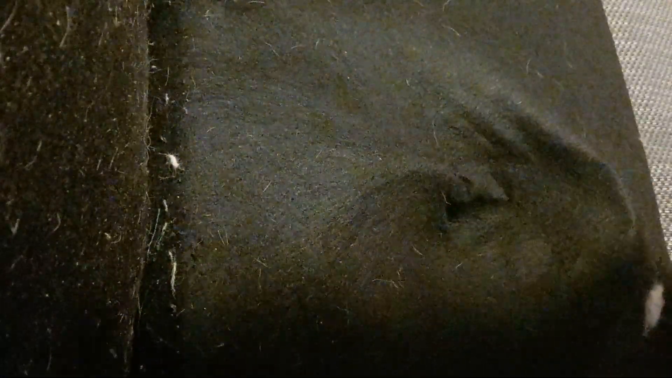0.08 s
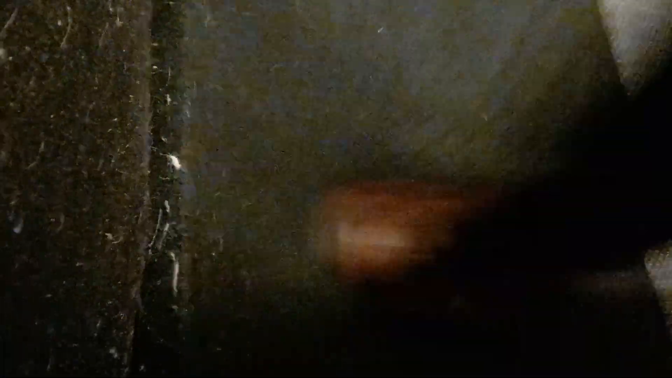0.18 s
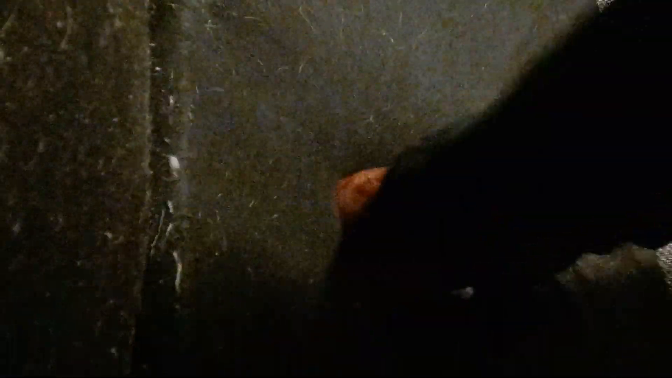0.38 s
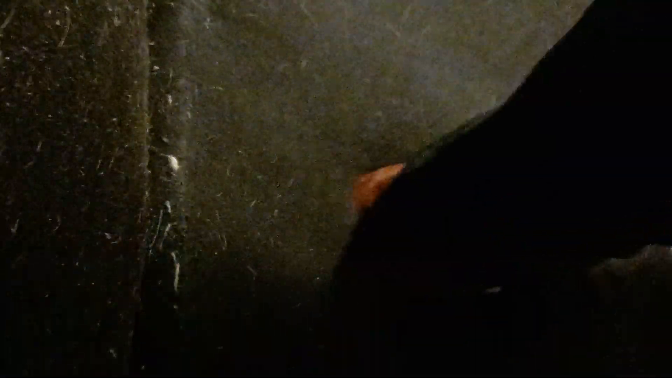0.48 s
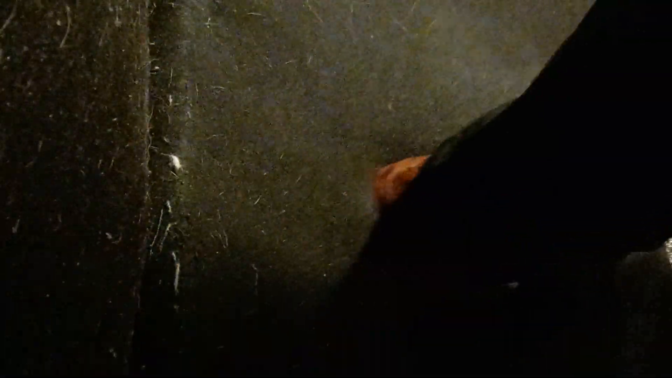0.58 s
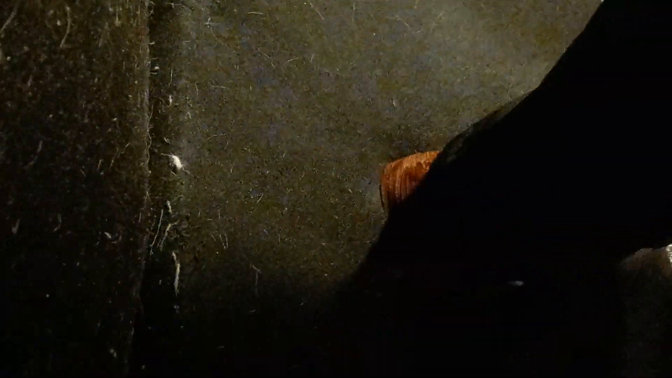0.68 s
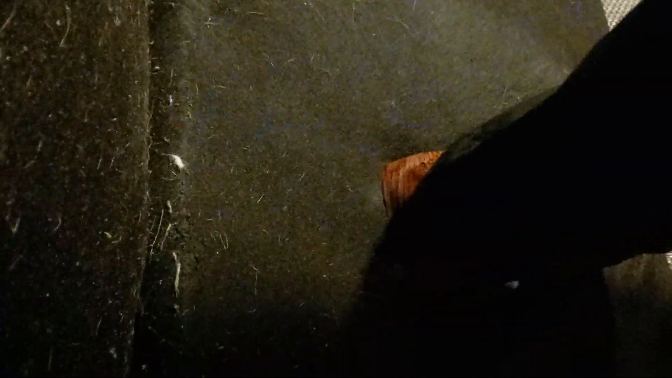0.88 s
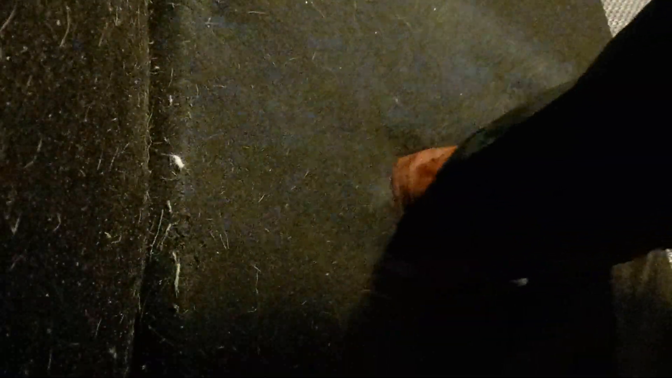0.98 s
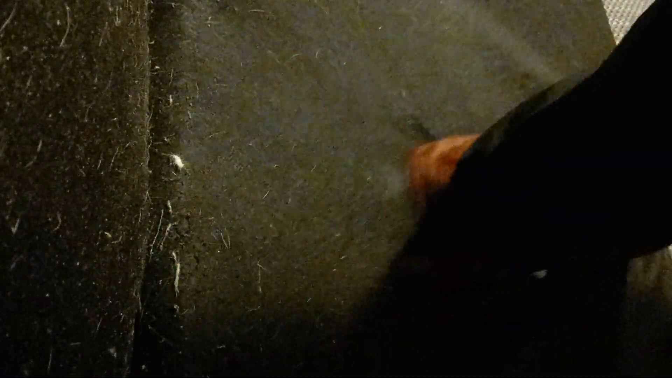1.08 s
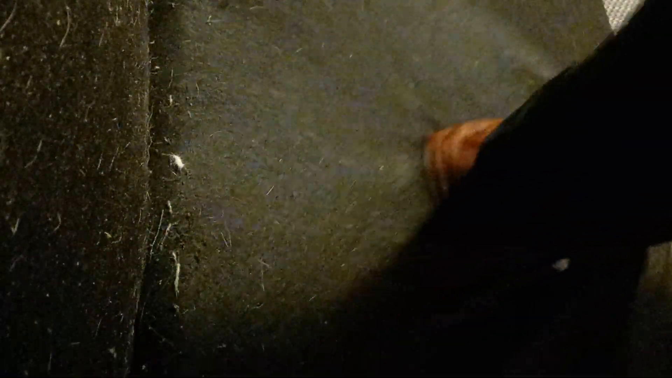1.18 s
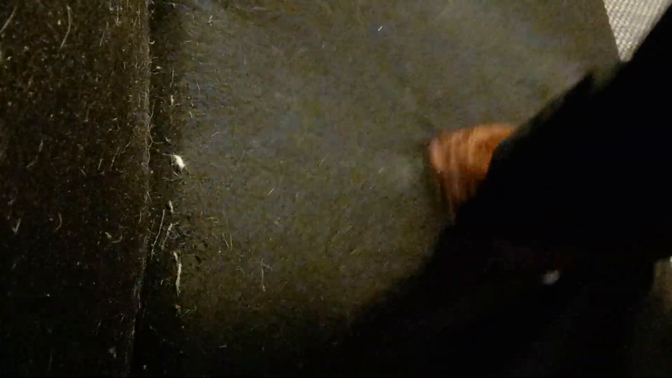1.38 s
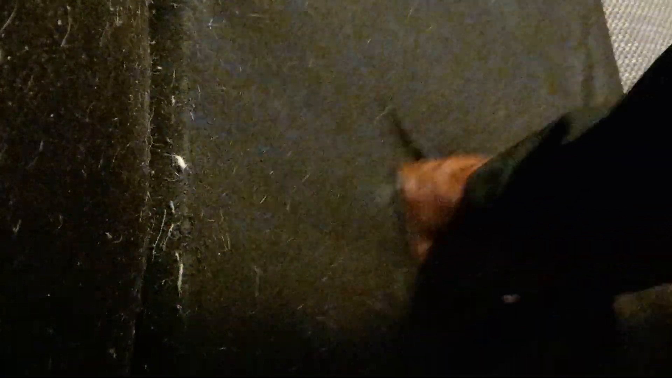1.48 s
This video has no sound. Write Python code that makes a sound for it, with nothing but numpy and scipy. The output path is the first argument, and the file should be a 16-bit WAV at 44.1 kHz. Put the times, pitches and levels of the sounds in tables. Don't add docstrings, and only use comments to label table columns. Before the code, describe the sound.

One shoe stomp crushes a spring-filled cushion: a quick crunch of clunking coils, falling in pitch to a low boom, with rasping cloth; then soft air buffets, few faint ticks. Very close stereo microphone, quiet room.

```python
import sys
import numpy as np
from scipy import signal
from scipy.fft import rfft, irfft
from scipy.io import wavfile
from scipy.ndimage import uniform_filter1d

SR = 44100
rng = np.random.default_rng(int(sys.argv[2]) if len(sys.argv) > 2 else 0)


def voltage_ratio(level):
    return 10 ** (np.asarray(level, float) / 20)


def digitize_waveform(pressure):
    field = np.atleast_2d(pressure).T
    bounded = np.clip(field, -1, 1)
    quanta = np.round(bounded * 32767).astype(np.int16)
    wavfile.write(sys.argv[1], SR, quanta)


N = 66150


def evened(x):
    return x / np.sqrt(np.mean(x ** 2) + 1e-20)


def read(points, hz):
    f, value = np.transpose(points)
    return np.interp(np.log(hz + 1), np.log(f + 1), value)


def add(mix, start_s, sound):
    part = mix[..., round(start_s * SR):][..., :sound.shape[-1]]
    part += sound[..., :part.shape[-1]]


def band_pass(x, order, edges_hz):
    return signal.sosfilt(signal.butter(order, edges_hz, "band", fs=SR, output="sos"), x)


def smoothed(x, size):
    return uniform_filter1d(uniform_filter1d(x, size=size), size=size)


def coloured(x, spectrum, same=None):
    hz, z = np.fft.rfftfreq(N, 1 / SR), rfft(x)
    if same:
        c = np.clip(read(same, hz), -1, 1)
        z = np.array([z[0], c * z[0] + np.sqrt(1 - c ** 2) * z[1]])
    closing = np.minimum(hz / spectrum[0][0], 1) ** 2
    return evened(irfft(z * voltage_ratio(read(spectrum, hz)) * closing, N))


def knock(mix, peak_s, peak_db, hz, cycles, skew, power=2, edge=0.):
    u = np.arange(0, 1, hz / cycles / SR)
    top = .5 ** (1 / skew)
    turn = 2 * np.pi * cycles * (u - top)
    hump = abs(np.sin(np.pi * u ** skew)) ** power
    wave = np.cos(turn) + edge * np.cos(3 * turn)
    add(mix, peak_s - top * cycles / hz, voltage_ratio(peak_db) * hump * wave)


# freq_hz, level_db (per Hz)
ROOM_HUSH = [(410, -48.5), (700, -14), (931, -11.5), (1070, -14.5), (1160, -1), (1490, -6.5), (2630, -19),
             (3370, -25), (15600, -34.5)]


def room():
    return voltage_ratio(-73.5) * coloured(rng.standard_normal((2, N)), ROOM_HUSH)


# peak_s, peak_db, pitch_hz, cycles
PUFFS_LEFT = [(.022, -33.5, 111, 6.4), (.049, -16.5, 137, 1.5), (.083, -50, 116, 2.4),
              (.152, -23, 171, 2.5), (.367, -17.5, 109, 0.57), (.419, -20, 96, 1.26),
              (.464, -24.5, 113, 4.2), (.504, -38, 91.5, 1.9), (.671, -25, 155.7, 7),
              (.702, -16.5, 119, 6.2), (.722, -15.5, 163, 1.75), (.797, -41, 84.5, 2.7),
              (.833, -41, 87, 2.9), (.85, -20.5, 101.4, 3.2), (.862, -27.5, 245, 4.2),
              (.901, -38, 267, 3.5), (.915, -19, 130, 0.99), (.967, -27, 105.8, 12.4),
              (.998, -15, 189, 2.05), (1.009, -20.5, 113, 4), (1.061, -23, 135, 2.3),
              (1.143, -25.5, 147, 3.3), (1.158, -14.5, 174, 2.9), (1.1645, -23, 511, 2.9),
              (1.173, -13.5, 102.6, 2.52), (1.197, -24, 137, 4.4), (1.214, -21, 122, 2.5),
              (1.322, -30, 113, 5.2), (1.376, -27, 126, 3.1), (1.442, -27.5, 125.3, 6.2),
              (.58, -31, 100, 2), (.669, -31, 330, 4), (.697, -24, 340, 4), (.722, -25, 320, 3),
                   (.748, -30, 110, 3), (.863, -34, 400, 4), (.905, -34, 400, 4), (.998, -35, 450, 2.5),
                   (1.1648, -30, 640, 2.5), (1.29, -28, 160, 3), (1.471, -20, 125, 2), (.785, -27, 85, 3),
                   (1.085, -28, 95, 3)]
# peak_s, peak_db, pitch_hz, cycles
PUFFS_RIGHT = [(0.053, -41.5, 88, 7.8), (0.562, -45.5, 88, 7.2), (0.613, -35.5, 92, 2.4),
               (0.841, -39, 90.3, 2), (0.923, -32, 104.6, 0.93), (1.069, -48, 87.5, 1.3),
               (1.105, -31, 97, 3.9), (1.149, -64, 109, 2), (1.243, -40.5, 90, 1.7), (1.263, -30, 90, 1.8),
               (1.298, -28, 91, 0.35), (1.396, -44, 88, 4.3)]
# freq_hz, level_db (per Hz)
DRAUGHT_SPECTRA = [
    [(20, -58.5), (45, -9), (90, 6), (130, -4), (220, -3.5), (430, -22), (860, -33.5), (1500, -71.5)],
    [(20, -52.5), (45, -21), (85, -1), (130, -1.5), (200, -19.5), (430, -21.5), (860, -29.5), (1500, -59)],
]
DRAUGHT_DB = [-36.5, -47]
LULL_S, LULL_HALF_S, LULL_DB = .595, .072, -13
GUST_SHARE, GUST_S = .36, .032
FLUTTER_DB, FLUTTER_HZ = -18, [235, 481]


def air():
    out = np.zeros((2, N))
    lull_db = LULL_DB * np.exp(-((np.arange(N) / SR - LULL_S) / LULL_HALF_S) ** 4)
    gust_window = np.hanning(round(2 * GUST_S * SR)) / (GUST_S * SR)
    below_450_hz = signal.butter(4, 450, fs=SR, output="sos")
    for port, puffs in enumerate([PUFFS_LEFT, PUFFS_RIGHT]):
        for puff in puffs:
            knock(out[port], *puff, skew=0.69)
        power = out[port] ** 2
        puff_strength = np.sqrt(abs(smoothed(power, 400)))
        gust = np.sqrt(signal.oaconvolve(power, gust_window, "same").clip(0))
        lumps_db = 4 * evened(smoothed(rng.standard_normal(N), 500))
        draught = coloured(rng.standard_normal(N) * voltage_ratio(lumps_db), DRAUGHT_SPECTRA[port])
        swell = signal.sosfilt(below_450_hz, GUST_SHARE * gust * draught)
        flutter = evened(band_pass(rng.standard_normal(N), 3, FLUTTER_HZ))
        out[port] += voltage_ratio(DRAUGHT_DB[port] + lull_db) * draught
        out[port] += swell + voltage_ratio(FLUTTER_DB) * puff_strength * flutter
    return -out


# start_s, level_db
RUB = [(0, -50.5), (.012, -61.5), (.045, -66.5), (.11, -60), (.14, -63.5), (.3, -43.5), (.46, -61.5),
       (.5, -53), (.55, -55.5), (.575, -54), (.61, -54), (.66, -63), (.8, -73.5), (.93, -69.5),
       (1.01, -65.5), (1.2, -59.5), (1.28, -64), (1.345, -65)]
# start_s, level_db
LIFT = [(1.362, -62), (1.373, -57), (1.445, -55), (1.46, -55.5), (1.5, -58.5)]
# start_s, level_db
DRAG = [(.171, -75), (.174, -47), (.195, -43), (.199, -36), (.221, -34), (.226, -28), (.246, -28),
        (.265, -38), (.272, -50)]
# start_s, level_db
REBOUND = [(.273, -59), (.29, -44.5), (.345, -44.5), (.362, -72), (.385, -58.5), (.41, -53.5), (.44, -63.5),
           (.455, -68)]
# freq_hz, level_db (per Hz)
SOFT_SPECTRUM = [(700, 4), (1600, -8), (2100, -11.5), (3400, -9.5), (8000, -9.5), (9000, -23.5),
                 (13000, -26.5), (15600, -18.5)]
# freq_hz, level_db (per Hz)
HARD_SPECTRUM = [(700, 0.5), (1700, -22), (2200, -20.5), (3000, -9.5), (7800, -12), (9300, -26),
                 (13000, -20.5), (15600, -25.5)]
# freq_hz, likeness (-1 to 1)
SOFT_SAME = [(700, 0.1), (1400, -0.42), (3000, 0.31), (7000, -0.15), (15000, -0)]
# freq_hz, likeness (-1 to 1)
HARD_SAME = [(700, 0.24), (2500, 0.62), (5000, -0.58), (9000, -0.049), (15000, 0)]
GRAINS_PER_S, GRAIN_DB, GRAIN_SHARE = 2000, 16.5, 0.17
RUB_LEFT_DB = 1


def cloth():
    t = np.arange(N) / SR
    grain_size = voltage_ratio(GRAIN_DB * np.minimum(rng.exponential(1, (2, N)), 4))
    struck = rng.random((2, N)) < GRAINS_PER_S / SR
    grains = grain_size * struck * rng.choice([-1, 1], (2, N))
    flicker = voltage_ratio(0.43 * evened(uniform_filter1d(rng.standard_normal(N), size=300)))
    x = (GRAIN_SHARE * evened(grains) + rng.standard_normal((2, N))) * flicker
    soft_db = np.interp(t, *np.transpose(RUB + LIFT))
    hard_db = np.interp(t, *np.transpose(DRAG + REBOUND), -120, -120)
    soft = voltage_ratio(soft_db) * coloured(x, SOFT_SPECTRUM, SOFT_SAME) * voltage_ratio([[RUB_LEFT_DB], [-RUB_LEFT_DB]])
    return soft + voltage_ratio(hard_db) * coloured(x, HARD_SPECTRUM, HARD_SAME)


# start_s, resonance_hz, level_db
CRUSH = [(0.167, 260, -47), (0.176, 247, -33), (0.208, 425, -35), (0.232, 600, -22), (0.268, 420, -23),
         (.31, 182, -31), (.42, 152, -39), (0.521, 200, -51), (.65, 450, -62)]
CRUSH_WIDTH_HZ = 418


def stuffing():
    s, hz, db = np.transpose(CRUSH)
    t = np.arange(N) / SR
    a, b = rng.standard_normal((2, N))
    x = np.array([a + 0.34 * b, a - 0.19 * b])
    turn = np.exp(2j * np.pi * np.cumsum(np.interp(t, s, hz)) / SR)
    r = np.exp(-np.pi * CRUSH_WIDTH_HZ / SR)
    once = signal.lfilter([1 - r], [1, -r], x / turn)
    twice = signal.lfilter([1 - r], [1, -r], once)
    groan = evened((turn * twice).real)
    return groan * voltage_ratio(np.interp(t, s, db, -120, -120))


# peak_s, peak_db, pitch_hz, cycles
CLUNKS = [(0.183, -36, 280, 4.5), (0.192, -20.5, 326.4, 3.2), (0.203, -16, 187, 1.7),
          (0.218, -18, 440, 3.4), (.2255, -13.5, 642, 5.5), (0.2312, -4.5, 520, 4), (0.227, -33, 1550, 9),
          (.2385, -16.5, 702, 4.5), (.249, -20, 1060, 6), (0.2414, -9, 274, 6.6), (0.2508, -8.5, 400, 2.6),
          (.259, -14.5, 340, 2.2), (0.2674, -8, 249.6, 4.1), (0.2678, -15.5, 897, 8.2),
          (.2635, -17, 546, 3), (0.278, -25.5, 890, 13), (0.319, -22.5, 242, 2.5), (.324, -35, 896, 8),
          (.333, -48, 179.6, 0.67), (0.398, -31, 291.7, 1.7), (1.446, -40.5, 533, 3.7),
          (0.174, -36, 1426, 4.9), (0.276, -13, 196, 2)]
CRACK_HZ, CRACK_FADE_S, CRACK_DB = [1100, 2000], .007, -10
CRACK_TOP_S, CRACK_FADE_DB_PER_S = .225, 350


def springs():
    out = np.zeros((2, N))
    a, b = np.moveaxis(rng.standard_normal((len(CLUNKS), 2, 900)), 1, 0)
    cracks = evened(band_pass(np.stack([.8 * a + .45 * b, a - .45 * b], 1), 2, CRACK_HZ))
    fade = np.exp(-np.arange(900) / SR / CRACK_FADE_S)
    for (s, db, hz, cycles), crack in zip(CLUNKS, cracks):
        knock(out, s, db, hz, cycles, skew=0.55)
        bite_db = CRACK_DB - min(CRACK_FADE_DB_PER_S * abs(s - CRACK_TOP_S), 14)
        add(out, s - .003, voltage_ratio(db + bite_db) * crack * fade)
    return out


# start_s, peak_db, centre_hz, fade_s
TICKS = [(0.1727, -34, 2400, 0.0016), (0.184, -36, 5900, 0.0023), (0.197, -31, 3100, 0.0016),
         (0.2034, -26.5, 7100, 0.0027), (0.2251, -20.5, 3330, 0.0038), (0.2291, -20, 2700, 0.0005),
         (.239, -29, 9600, 0.0015), (.2435, -25, 3970, .002), (.249, -35, 4500, .002),
         (.265, -34, 6500, .002), (.402, -46, 3560, .003), (0.568, -42.5, 4500, 0.0064),
         (.594, -38.5, 3970, 0.0013), (0.61, -51.5, 4500, .0015), (0.7043, -55.5, 6000, 0.0014),
         (.745, -60.5, 6500, 0.0025), (1.1262, -52.5, 5000, 0.0013), (1.1554, -51.5, 7000, 0.00088),
         (1.203, -53, 5500, 0.0013), (1.296, -52, 7400, 0.0036), (1.2975, -54.5, 3240, .002),
         (1.349, -49, 4500, .002), (1.373, -50, 3800, .002), (1.405, -54, 1090, 0.0059),
         (1.419, -55, 1820, 0.0047), (1.443, -50, 1570, 0.0067), (1.453, -53, 890, 0.0071)]
TICK_SPREAD, TICK_TOP_HZ, TICK_LEFT_DB = 1.6, 8300, 1.8


def fibres():
    out, t = np.zeros((2, N)), np.arange(700) / SR
    lean = voltage_ratio([[TICK_LEFT_DB], [-TICK_LEFT_DB]])
    for (s, db, hz, fade_s), noise in zip(TICKS, rng.standard_normal((len(TICKS), 2, 700))):
        top_hz = hz * TICK_SPREAD
        if hz <= 7500:
            top_hz = min(top_hz, TICK_TOP_HZ)
        shared = noise + .5 * noise[::-1]
        burst = band_pass(shared * np.exp(-t / fade_s), 4, [hz / TICK_SPREAD, top_hz])
        add(out, s, voltage_ratio(db) * lean * burst / abs(burst).max())
    return out


# peak_s, peak_db, pitch_hz, cycles
BOOMS = [(.225, -25, 70, 3), (.242, -19, 125, 3.5), (.268, -19, 85, 2.2), (.2975, -8.5, 110, 4.3),
         (.325, -25, 85, 2.5), (.39, -35, 75, 4), (.502, -31, 90, 2.5)]
BOOM_RIGHT_DB, BOOM_LAG_S = -1.5, 0.0012


def frame():
    out = np.zeros((2, N))
    shape = dict(skew=1.75, power=.5, edge=voltage_ratio(-14))
    for s, db, hz, cycles in BOOMS:
        knock(out[0], s, db, hz, cycles, **shape)
        knock(out[1], s + BOOM_LAG_S, db + BOOM_RIGHT_DB, hz, cycles, **shape)
    return out


def scene():
    hush = room()
    return springs() + frame() + stuffing() + air() + cloth() + fibres() + hush


def low_pass(x):
    return signal.sosfilt(signal.butter(12, 15740, fs=SR, output="sos"), x)


def record(dry):
    x = signal.sosfilt(signal.butter(6, 46, "high", fs=SR, output="sos"), dry)
    x = irfft(rfft(x) * (np.fft.rfftfreq(N, 1 / SR) < 15780), N)
    return low_pass(x)


dry = scene()
out = record(dry)
digitize_waveform(out)
```